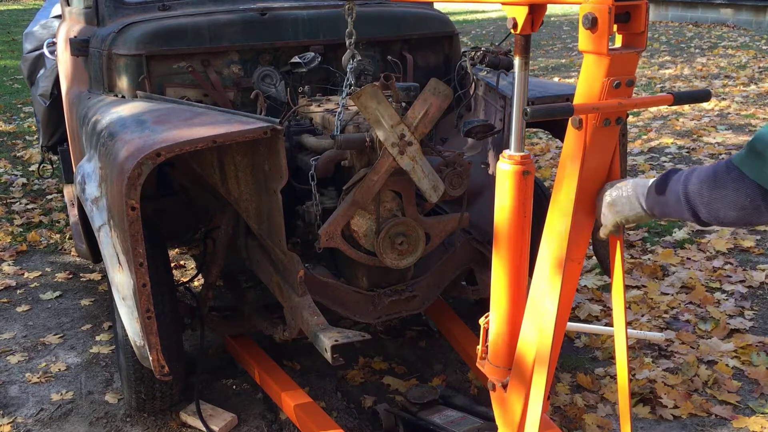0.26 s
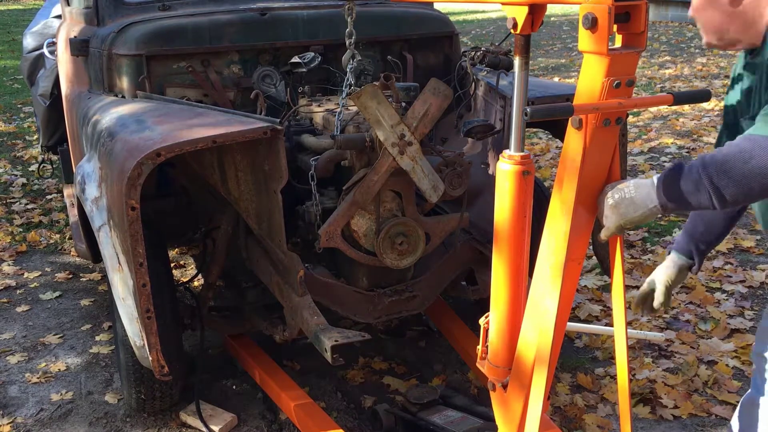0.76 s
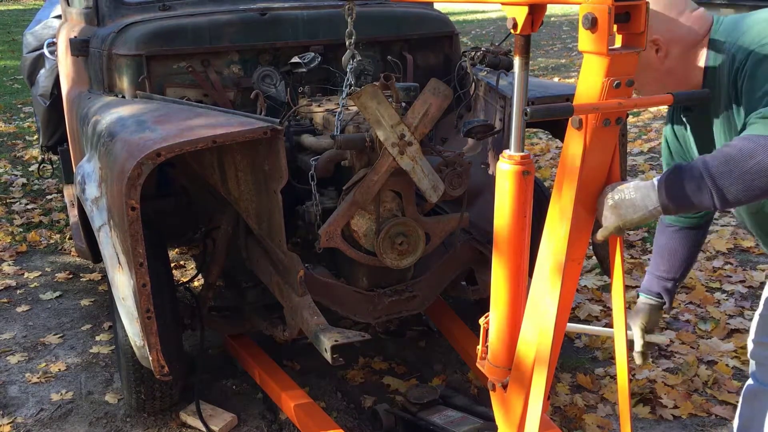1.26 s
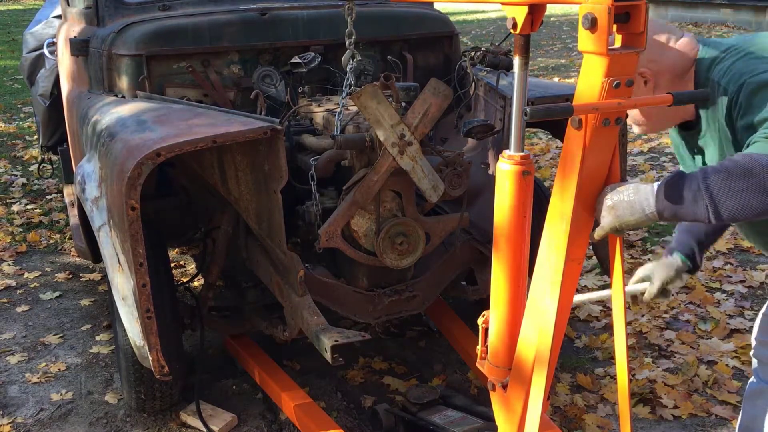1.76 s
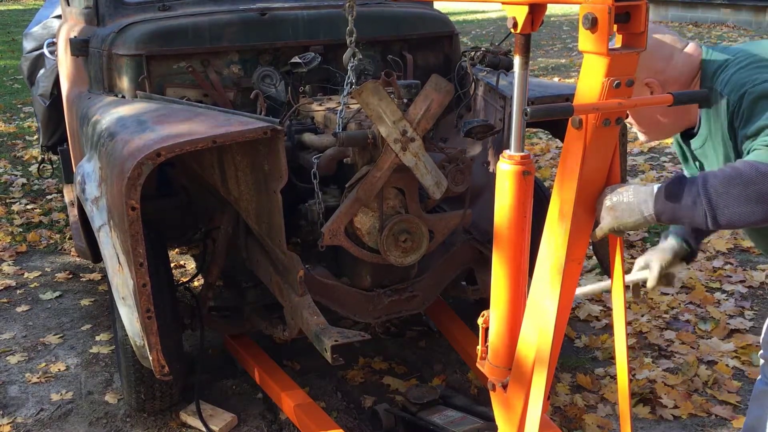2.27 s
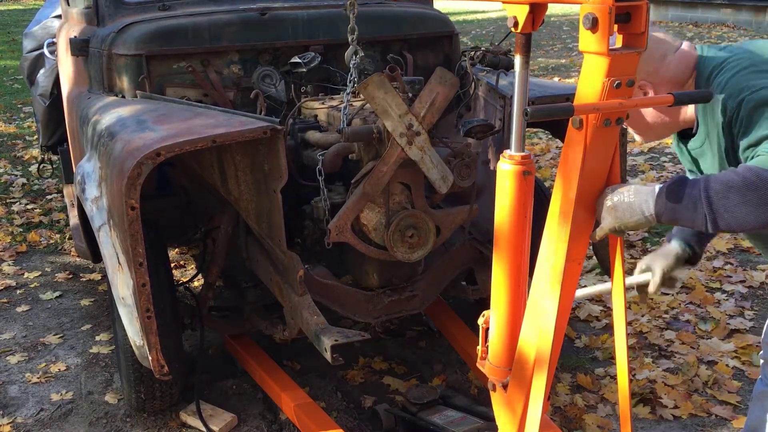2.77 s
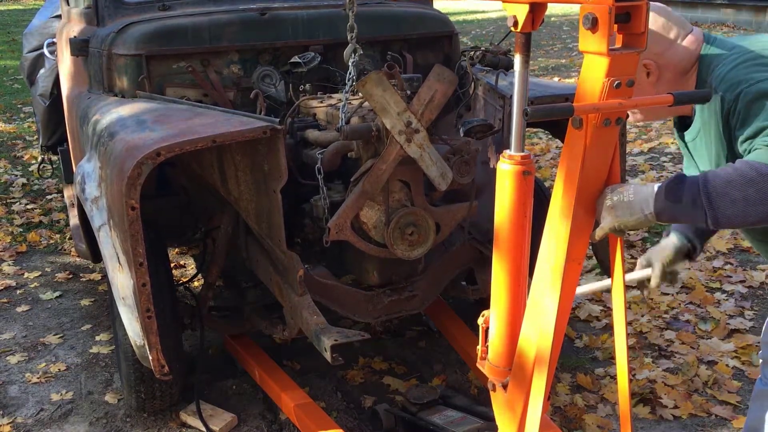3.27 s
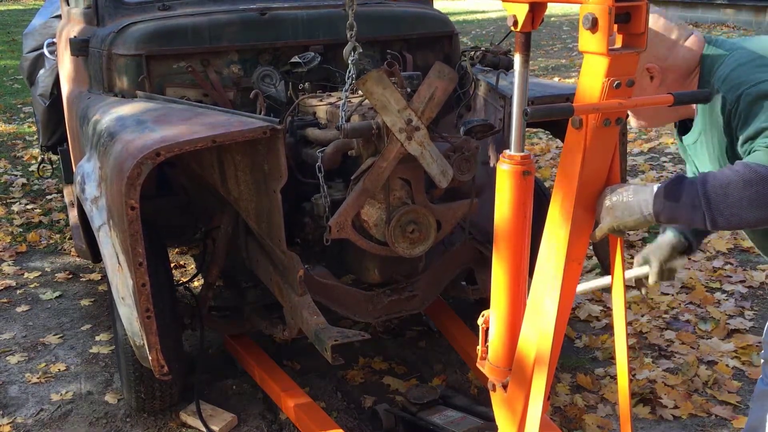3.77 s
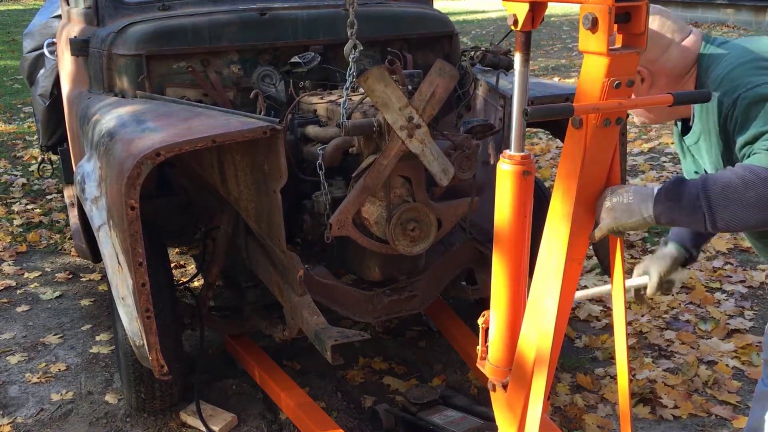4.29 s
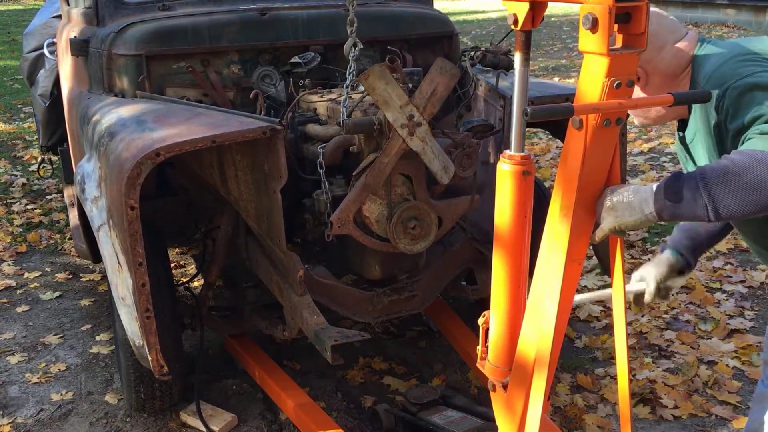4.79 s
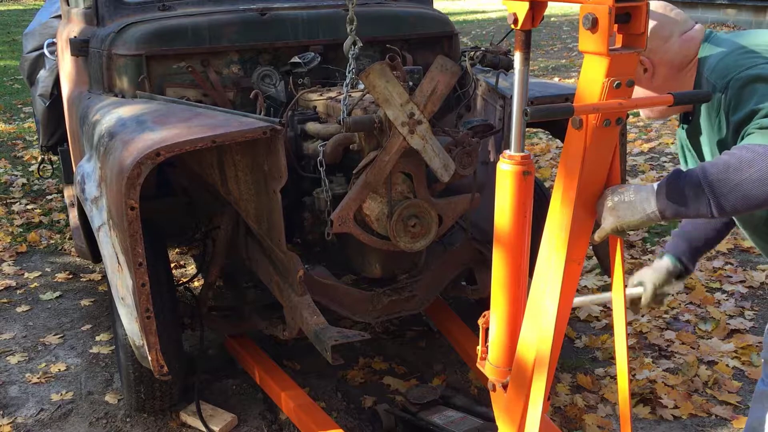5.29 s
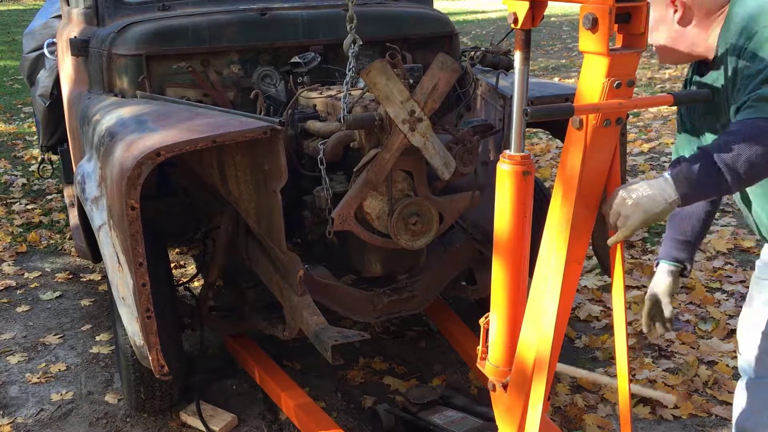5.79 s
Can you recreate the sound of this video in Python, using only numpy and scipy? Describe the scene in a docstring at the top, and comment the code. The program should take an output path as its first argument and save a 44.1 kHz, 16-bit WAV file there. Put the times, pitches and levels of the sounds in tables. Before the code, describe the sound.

Wind buffets the microphone as loose metal linkage clacks and knocks in uneven pumping strokes, ending with a sliding handle's thin squeal and harsh clank.

```python
"""A hydraulic engine hoist is pumped by hand in a leafy yard, while wind buffets the microphone throughout.
Wind, far traffic and leaves are shaped noise. Then the loose linkage clacks, the valve ticks and the piston
knocks: short noise bursts and ringing modes. The loaded frame groans and pins grind, as uneven noise and rings.
At the end the steel handle slides in its socket and sings, as swelling sines. It drops with a clank,
modes and noise together, that overloads the recorder."""
import sys
import numpy as np
from scipy import signal
from scipy.fft import rfft, irfft, next_fast_len
from scipy.io import wavfile

SR = 44100
rng = np.random.default_rng(int(sys.argv[2]) if len(sys.argv) > 2 else 0)


def transcribe(signal):
    """Save signal, clipped to [-1, 1], as a 16-bit WAV file at the path in sys.argv[1]."""
    frames = np.atleast_2d(signal).T
    limited = np.clip(frames, -1, 1)
    pcm = np.round(limited * 32767).astype(np.int16)
    wavfile.write(sys.argv[1], SR, pcm)


N = 266805

# Wind on the microphone. Each row: time in seconds, buffeting level in dB, flutter level in dB.
WIND_LEVELS = [(0, -20.5, -39), (.6, -15.5, -31.5), (1.3, -19.5, -32.5), (2.3, -20, -31), (2.7, -23.5, -36),
               (3.85, -24, -36), (4.25, -22, -33), (4.7, -23, -41), (5.3, -28.5, -42), (6.05, -24.5, -38.5)]
# Tone of the low buffeting and the higher flutter. Each row: frequency in Hz, relative level in dB per Hz.
BUFFET_COLOUR = [(8, 0.5), (20, 3.5), (40, -5), (75, -12.5)]
FLUTTER_COLOUR = [(40, -9), (110, -10.5), (216, -28), (300, -33.5), (500, -40)]
# Far traffic and leaves. Each row: time in seconds, hum level in dB, rustle level in dB.
YARD_LEVELS = [(0, -45.5, -51), (.9, -47, -50.5), (1.3, -46.5, -53.5), (6.05, -45.5, -54)]
# Tone of the traffic hum and the leaves. Each row: frequency in Hz, relative level in dB per Hz.
HUM_COLOUR = [(200, 8.5), (400, -6), (750, 3), (1400, -0.5), (3000, -18)]
RUSTLE_COLOUR = [(1200, -5), (2000, -3.5), (8000, -4.5), (10600, -15), (15200, -15.5), (16600, -47)]

# Linkage clacks. Each row: time in seconds, level in dB, extra level of the high part in dB, main ping in Hz.
LINKAGE_CLACKS = [(1.4303, -32.5, 13.5, 2440), (1.624, -23, 3, 5260), (1.891, -13, -40, 2570),
                  (2.0045, -19.5, -5, 3700), (2.2227, -8.5, 11, 2300), (2.7, -23, -4, 2400),
                  (2.7337, -9, 4, 2180), (2.9274, -21.5, -34, 2660), (2.998, -29.5, -19, 2150),
                  (3.0126, -29, -18, 2290), (3.2233, -27, -1, 2310), (3.258, -23.5, 5, 4740),
                  (3.4479, -25.5, -25, 2610), (3.5153, -32, -21, 1680), (3.529, -25.5, -16, 2160),
                  (3.5715, -21, -24, 3400), (3.728, -23.5, -25, 2160), (3.936, -19.5, -15, 3720),
                  (4.229, -18.5, 9, 2120), (4.247, -4.5, 10.5, 3980), (4.4044, -22.5, -18, 2940),
                  (4.58, -33, -20, 2350), (4.729, -12, 3, 2190), (4.9402, -26.5, -22, 2100),
                  (5.0744, -22, 4.5, 2000), (5.217, -21.5, 7, 1930), (5.2319, -2, 7, 2316),
                  (5.5358, -32.5, -16, 2245), (5.687, -34.5, -27, 2270)]
# Ringing of the linkage steel. Each row: frequency in Hz, relative level in dB, time to fall 60 dB in seconds.
LINKAGE_MODES = [(865, -8.5, 0.058), (1977, -15, 0.054), (2239, -11, 0.2), (2612, -13, 0.058),
                 (2786, -31, 0.44), (3236, -17.5, 0.14), (3454, -16, 0.074), (3760, -16, 0.052),
                 (3970, -25, 0.084), (4193, -15, 0.068), (4570, -22.5, 0.17), (5060, -19.5, 0.033),
                 (5560, -25.5, 0.03)]
BOUNCE_S, BOUNCE_LOSS_DB = 0.0069, 11.5  # a struck pin rebounds twice: rough spacing, loss each time
CRACK_T60_S = 0.012  # time for the crack to fall 60 dB

# Valve ticks. Each row: time in seconds, level in dB.
VALVE_TICKS = [(1.6733, -27), (2.0165, -21.5), (2.7626, -24.5), (3.032, -32.5), (3.26, -26.5),
               (3.55, -20.5), (3.771, -24), (4.0503, -27), (4.545, -23), (4.761, -24), (5.041, -20.5)]
# Piston knocks at the stroke end. Each row: time in seconds, level in dB.
PISTON_KNOCKS = [(1.708, -20), (2.273, -20), (2.781, -20.5), (3.284, -22), (3.794, -19), (3.963, -22.5),
                 (4.281, -23.5), (4.785, -19.5), (5.278, -22.5)]
# Ringing of valve and piston. Each row: frequency in Hz, relative level in dB, time to fall 60 dB in seconds.
VALVE_MODES = [(6600, -3, 0.03), (8705, -2, 0.035), (12130, -7, 0.06), (13710, -2, 0.04)]
PISTON_MODES = [(823, 0, 0.057), (1345, -7, 0.14), (1717, -16, 0.25), (1798, -17, 0.2), (2256, -8, 0.1)]

# Frame groans under load. Each row: start in seconds, level in dB, hold in seconds, boom ringing in dB.
FRAME_GROANS = [(1.993, -32, 0.029, 2.5), (2.225, -42.5, 0.22, 2), (2.492, -26, 0.0086, 0.5),
                (2.576, -33.5, 0.12, 0), (3.892, -31.5, 0.054, -12), (4.373, -38, 0.04, -1.5),
                (4.455, -35.5, 0.014, -21), (4.901, -31.5, 0.038, -28), (5.35, -41.5, 0.18, -11)]
GROAN_RISE_S, GROAN_FALL_DB_PER_S = 0.059, 119
# Tone of the groans. Each row: frequency in Hz, relative level in dB per Hz.
GROAN_SPECTRUM = [(110, -3), (160, 11), (250, 2.5), (370, 6.5), (600, -3.5), (950, -0.5), (1400, -7),
                  (3000, -24), (9000, -38)]
# Ringing of the boom. Each row: frequency in Hz, relative level in dB, time to fall 60 dB in seconds.
BOOM_MODES = [(365, -4, .12), (460, -3, .05), (600, -4, .05), (920, 0, .035)]
# Pins grinding over each other. Each row: time in seconds, level in dB.
PIN_RASPS = [(2.503, -24), (2.5301, -23.5), (2.575, -24.5), (3.952, -8.5), (3.991, -14), (4.416, -16),
             (4.487, -16), (4.9735, -13.5), (5.426, -15.5)]

# The tube squeals as it slides out, mostly the high partials first.
# Each row: frequency in Hz, loudest time in seconds, level in dB, seconds from loudest to 10 dB less.
SQUEAL_PARTIALS = [(1135, 5.81, -42, .06), (2172, 5.8, -42, .15), (3500, 5.77, -50, .2),
                   (5055, 5.71, -54, .09), (6810, 5.68, -51, .075), (8710, 5.67, -57, .07),
                   (10950, 5.71, -61, .05)]
SEATED_UNTIL_S, SEATED_SHARP = 5.685, 0.022  # deep in its socket the tube sounds this share higher
# The handle falls. Each row: time in seconds, level in dB.
HANDLE_DROP = [(5.953, -1)]
# Bending modes of the handle tube, some in close pairs. Each entry: frequency in Hz.
TUBE_HZ = [1135, 2131, 2172, 3500, 3577, 5055, 6961, 8878, 10940]
# The same tube modes when struck. Each row: relative level in dB, time to fall 60 dB in seconds.
TUBE_MODES = [(-16.5, 3), (-5, 0.21), (-24, 0.9), (-14, 0.4), (-10, 0.2), (-20, 0.3), (-25, 0.24),
              (-6.5, 0.16), (-33, 0.61)]
# Modes of the frame. Each entry: frequency in Hz.
FRAME_MODE_HZ = [646, 751, 962, 1336, 1666, 1943, 2486, 4355]
# The same frame modes when struck. Each row: relative level in dB, time to fall 60 dB in seconds.
FRAME_MODES = [(0.5, 0.075), (2.5, 0.058), (1, 0.11), (1, 0.13), (-8, 0.15), (-12, 0.25), (12.5, 0.025),
               (-5, 0.11)]
# Tone of the noise of the fall. Each row: frequency in Hz, relative level in dB per Hz.
CRASH_COLOUR = [(200, -14.5), (600, -8.5), (1400, 0.5), (3000, -8), (8000, -23), (16000, -46)]

CEILING, CUTOFF_HZ = 0.75, 16700  # overload limit as a share of full scale; treble limit of the recorder


def amp(db):
    """Turn decibels into a gain."""
    return 10 ** (np.asarray(db) / 20)


def rms_one(x):
    """Scale a signal to an average strength (rms) of 1."""
    return x / np.sqrt(np.mean(x ** 2) + 1e-20)


def in_time(rows):
    """Draw straight lines between table rows, one value a sample."""
    seconds, *columns = np.transpose(rows)
    return [np.interp(np.arange(N) / SR, seconds, column) for column in columns]


def coloured(spectrum):
    """Shape noise to the given spectrum, rms 1."""
    hz, db = np.transpose(spectrum)
    size = next_fast_len(N)
    grid = np.fft.rfftfreq(size, 1 / SR) + 1e-3  # keeps log away from zero
    shape = amp(np.interp(np.log(grid), np.log(hz), db, left=-90, right=-90))
    noise = rng.standard_normal(size)
    return rms_one(irfft(rfft(noise) * shape, size)[:N])


def band(low_hz, high_hz, grit=0, per_s=600):
    """Make noise between two edges, with a share of separate uneven clicks, rms 1."""
    clicks = rms_one((rng.random(N) < per_s / SR) * rng.laplace(size=N))
    source = grit * clicks + (1 - grit) * rng.standard_normal(N)
    bandpass = signal.butter(2, [low_hz, high_hz], "band", fs=SR, output="sos")
    return rms_one(signal.sosfilt(bandpass, source))


def drift(rate):
    """Wander by chance, with spread 1; a higher rate in Hz wanders faster."""
    r = np.exp(-2 * np.pi * rate / SR)
    noise = rng.standard_normal(N + SR)
    return rms_one(signal.lfilter([1], [1, -2 * r, r * r], noise)[SR:])  # skip the filter's start


def ring(force, hz, t60):
    """Let a force ring a mode: a unit click starts a dying sine of height 1."""
    r = amp(-60 / (t60 * SR))
    w = 2 * np.pi * hz / SR
    return signal.lfilter([0, np.sin(w)], [1, -2 * r * np.cos(w), r * r], force + 1e-18)


def strike(seconds, blow_db, modes, spread_db, contact_s=0.0, chatter=0.0):
    """Ring every mode at each blow with chance strengths; a chattering contact swells and trails after it."""
    at = np.round(np.asarray(seconds) * SR).astype(int)
    out = np.zeros(N)
    luck = rng.standard_normal((len(at), len(modes)))
    keep = np.exp(-1 / (max(contact_s, 1e-6) * SR))
    grit = chatter * rng.standard_normal(N)
    for k, (hz, level_db, t60) in enumerate(modes):
        clicks = np.zeros(N)
        sign = (-1) ** k  # neighbouring modes start in opposite directions
        clicks[at] = amp(blow_db(hz) + level_db + spread_db * luck[:, k]) * sign
        swell = signal.lfilter([2 * (1 - keep) ** 1.5], [1, -2 * keep, keep ** 2], clicks + 1e-18)
        out += ring(clicks + grit * swell, hz, t60)
    return out


def dying(seconds, level_db, t60, rise_s):
    """Shape bursts that rise fast and die exponentially, adding their powers."""
    t = np.arange(SR // 2) / SR
    power = np.zeros(N + SR)
    for s, db, decay in np.broadcast(seconds, level_db, t60):
        at = round(s * SR)
        fall = amp(db - 60 * t / max(decay, 0.005))
        power[at:at + len(t)] += (fall * (1 - np.exp(-t / rise_s))) ** 2
    return np.sqrt(power[:N])


def wind():
    """Wind pushes on the microphone: low buffeting and higher flutter swell with the same gusts."""
    buffet_db, flutter_db = in_time(WIND_LEVELS)
    gust = drift(4.5)
    buffet = amp(buffet_db + 2.0 * gust) * coloured(BUFFET_COLOUR)
    return buffet + amp(flutter_db + 2.3 * gust) * coloured(FLUTTER_COLOUR)


def yard():
    """Far traffic hums as shaped noise, and leaves rustle with a flickering level."""
    hum_db, rustle_db = in_time(YARD_LEVELS)
    flicker_db = 1.2 * drift(8)
    hum = amp(hum_db) * coloured(HUM_COLOUR)
    return hum + amp(rustle_db + flicker_db) * coloured(RUSTLE_COLOUR)


def linkage():
    """Loose pins chatter after each contact: a crack, noise dying in three bands, and the steel rings."""
    s, db, high_db, ping_hz = np.transpose(LINKAGE_CLACKS)
    t60 = 0.21 + 0.0007 * db  # harder blows rattle longer
    low = dying(s, db - 21.0, 1.3 * t60, 0.0005) * band(137, 1530)
    mid = dying(s, 1.03 * db - 21, t60, 0.0011) * band(1400, 4300, grit=0.38)
    high = dying(s, db + high_db - 29.5, 0.46 * t60, 0.0049) * band(2600, 13700, grit=0.35)

    rebound = np.arange(3)[:, None]  # first touch, then two rebounds
    touch_s = s + BOUNCE_S * rebound * rng.uniform(0.8, 1.1, len(s))
    touch_db = db - BOUNCE_LOSS_DB * rebound
    crack_shape = dying(touch_s, touch_db + 0.98 * high_db - 3, CRACK_T60_S, 0.0029)
    crack = crack_shape * band(3500, 8200)
    echo = dying(s, 0.94 * db - 11.5, 0.17, 0.016) * band(1070, 4400)  # car body and house answer

    tone = strike(touch_s.ravel() + 0.001, lambda hz: touch_db.ravel() - 7, LINKAGE_MODES,
                  spread_db=2.5, contact_s=0.0016, chatter=1.2)
    pings = np.zeros(N)
    for at, level_db, main_hz in zip(s, db, ping_hz):
        pings += strike([at + 0.00152], lambda hz: level_db, [(main_hz, -10, 0.075)], spread_db=2.0)
    loose = amp(2.5 * drift(70))  # slack joints damp the ringing unevenly
    return low + mid + high + crack + echo + loose * (tone + pings)


def valve():
    """The valve ball ticks and bounces once; its ringing grows faster than the tick as it lands harder."""
    s, db = np.transpose(VALVE_TICKS)
    touch_s = np.append(s, s + 0.017)
    ring_db = np.append(2 * db, 2 * db - 18)
    touch_db = np.append(db, db - 3)
    ringing = strike(touch_s, lambda hz: ring_db + 11, VALVE_MODES,
                     spread_db=3, contact_s=0.0015, chatter=0.8)
    return ringing + dying(touch_s, 0.71 * touch_db - 32, 0.13, 0.0033) * band(3400, 12000)


def piston():
    """The piston knocks dully at the stroke end: softened ringing, a noise burst and a hiss."""
    s, db = np.transpose(PISTON_KNOCKS)
    blow = strike(s, lambda hz: db - 3, PISTON_MODES, spread_db=3, contact_s=0.003, chatter=0.8)
    thud = signal.lfilter(np.hanning(9) / 4, [1], blow)  # oil cushions the blow
    whistle = dying(s + 0.008, db - 18, 0.1, 0.0043) * band(7510, 7900)  # a brief high hiss follows
    burst = dying(s, db - 6, 0.15, 0.0044) * band(680, 2270, grit=0.098)
    return thud + whistle + burst


def groans():
    """Coarse slips judder through each swelling groan and ring the boom, its upper modes more in loud groans."""
    t = np.arange(N) / SR
    power, low_power, upper_power = 0, 0, 0
    for s, db, hold_s, boom_db in FRAME_GROANS:
        rise = np.clip((t - s) / GROAN_RISE_S, 0, 1) ** 2
        falling_s = np.maximum(t - s - GROAN_RISE_S - hold_s, 0)
        swell = (rise * amp(db - GROAN_FALL_DB_PER_S * falling_s)) ** 2
        power = power + swell
        low_power = low_power + swell * amp(2 * boom_db)
        upper_power = upper_power + swell * amp(2 * boom_db + 2.34 * (db + 27.0))
    slips = amp(0.7 * drift(94))
    boom = [amp(db) * rms_one(ring(slips * rng.standard_normal(N), hz, t60)) for hz, db, t60 in BOOM_MODES]
    low, *upper = boom
    rasp = amp(-7.0) * band(750, 3300, grit=0.6, per_s=900)
    groan = np.sqrt(power) * slips * (coloured(GROAN_SPECTRUM) + rasp)
    return groan + np.sqrt(low_power) * low + np.sqrt(upper_power) * sum(upper)


def rasps():
    """A grinding slip swells over some milliseconds, grainy and broad, and the steel rings with it."""
    s, db = np.transpose(PIN_RASPS)
    grind = band(180, 2600) + amp(-3.5) * band(1400, 7700, grit=0.2)
    steel = strike(s, lambda hz: db - 21.0, LINKAGE_MODES, spread_db=1.0, contact_s=0.012, chatter=2.8)
    roughness = amp(3.2 * drift(78))
    return dying(s, db - 6.0, 0.086, 0.0088) * roughness * grind + steel


def handle_squeal():
    """The sliding tube sings: each partial is a sine that swells and fades unevenly and wavers in phase."""
    t = np.arange(N) / SR
    turns = np.cumsum(1 + SEATED_SHARP * (t < SEATED_UNTIL_S)) / SR
    sing = np.zeros(N)
    for hz, s, db, fade_s in SQUEAL_PARTIALS:
        level = amp(db - 10 * ((t - s) / fade_s) ** 2 + 2.5 * drift(18))
        sing += level * np.sin(2 * np.pi * hz * turns + 0.4 * drift(30))
    return sing


def handle_fall():
    """The fall strikes tube and frame together; both ring, with a burst of noise."""
    s, db = np.transpose(HANDLE_DROP)
    tube_modes = [(hz, *mode) for hz, mode in zip(TUBE_HZ, TUBE_MODES)]
    frame_modes = [(hz, *mode) for hz, mode in zip(FRAME_MODE_HZ, FRAME_MODES)]
    tube = strike(s, lambda hz: db, tube_modes, spread_db=0.0)
    frame = strike(s, lambda hz: db, frame_modes, spread_db=3.5)
    crash = dying(s, db + 1.5, 0.21, 0.0037) * coloured(CRASH_COLOUR)
    return amp(2.0 * drift(50)) * (tube + frame) + crash  # the ringing level wavers


def scene():
    """Add hoist, wind and yard on one microphone."""
    surroundings = wind() + yard()
    hoist = linkage() + valve() + piston() + groans() + rasps()
    return (surroundings + hoist + handle_squeal() + handle_fall())[None]


def record(dry):
    """Overload hard at the ceiling, then cut the top of the treble."""
    clipped = dry / (1 + np.abs(dry / CEILING) ** 12) ** (1 / 12)
    lowpass = signal.ellip(12, 0.5, 75, CUTOFF_HZ, fs=SR, output="sos")
    return signal.sosfilt(lowpass, clipped)


dry = scene()
out = record(dry)
transcribe(out)
```